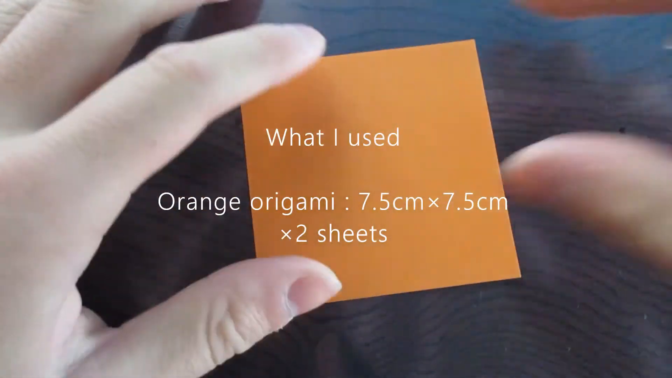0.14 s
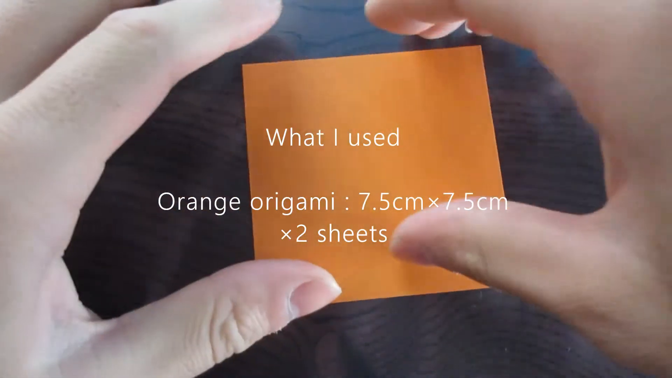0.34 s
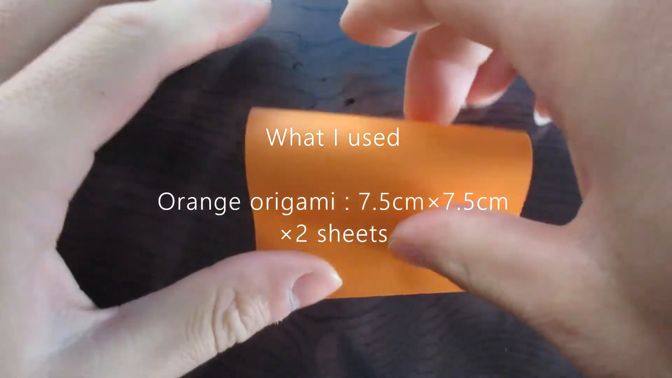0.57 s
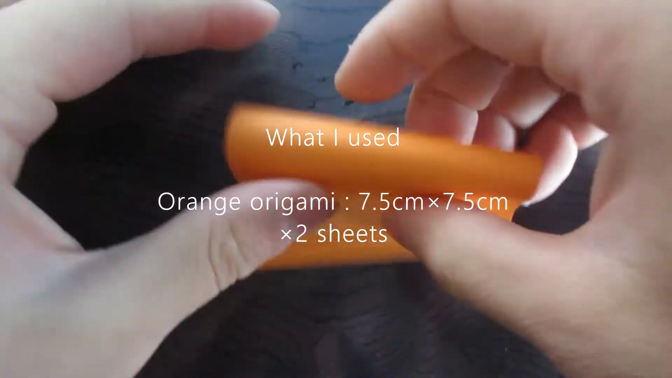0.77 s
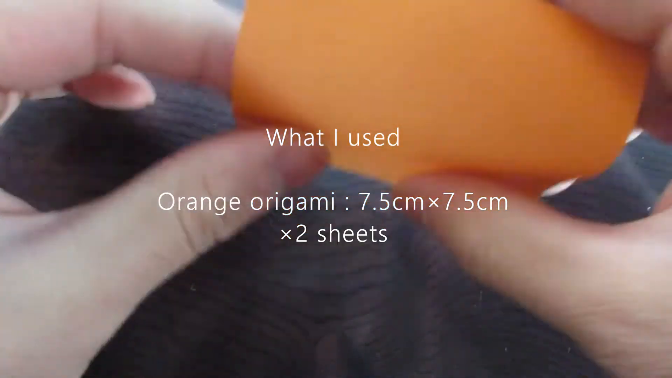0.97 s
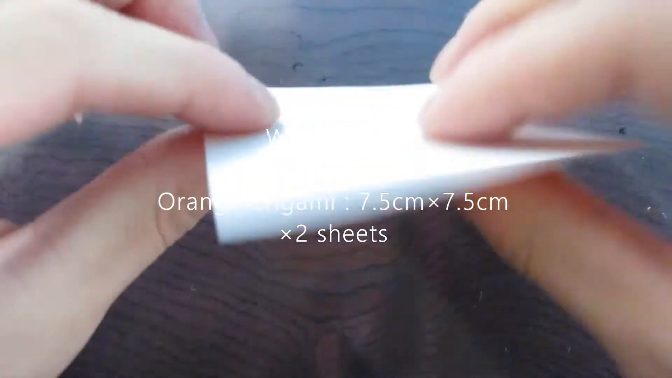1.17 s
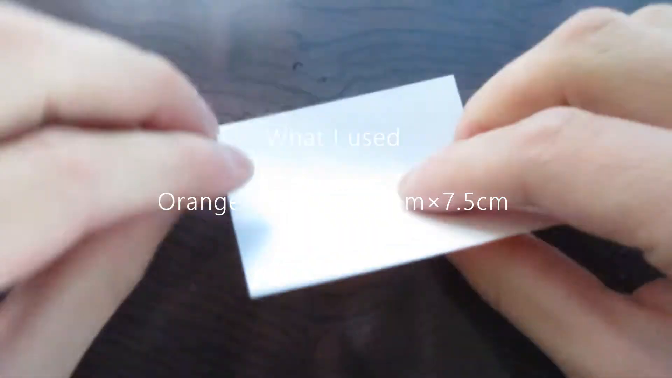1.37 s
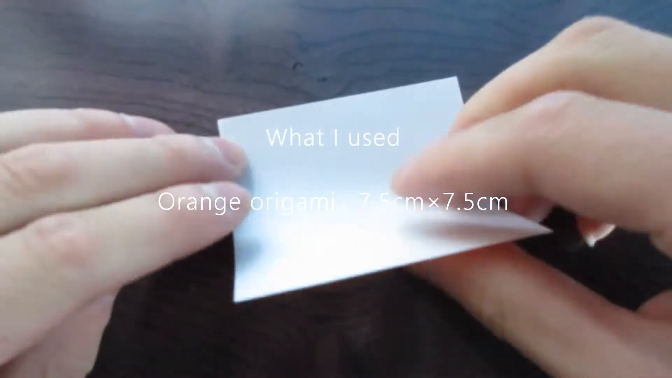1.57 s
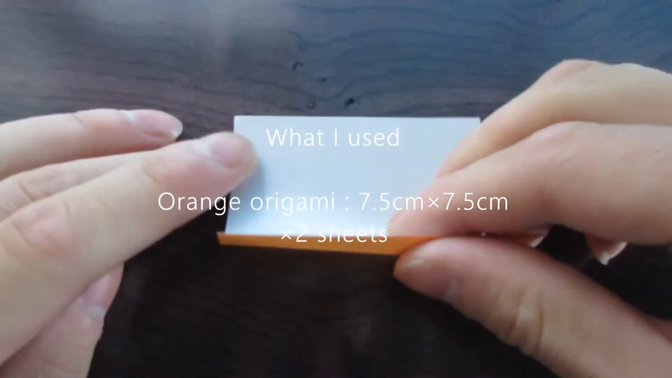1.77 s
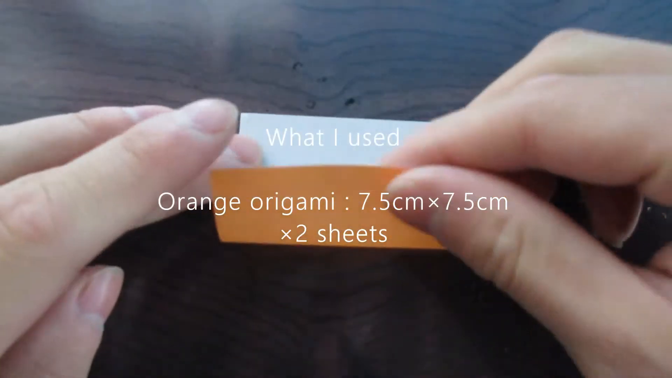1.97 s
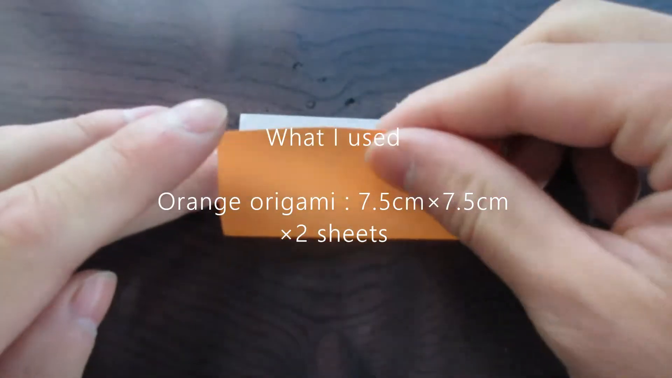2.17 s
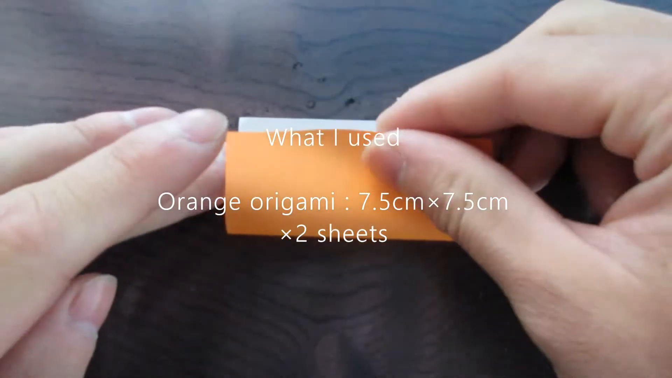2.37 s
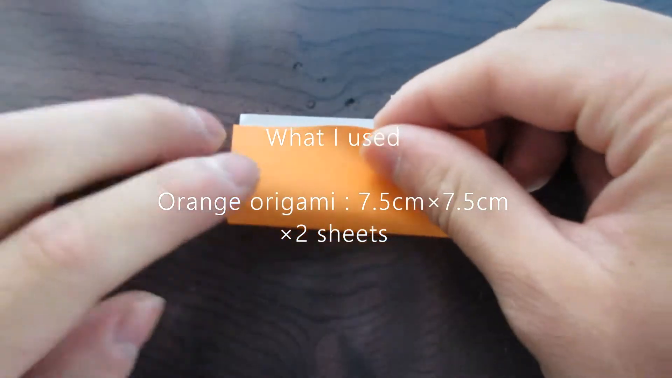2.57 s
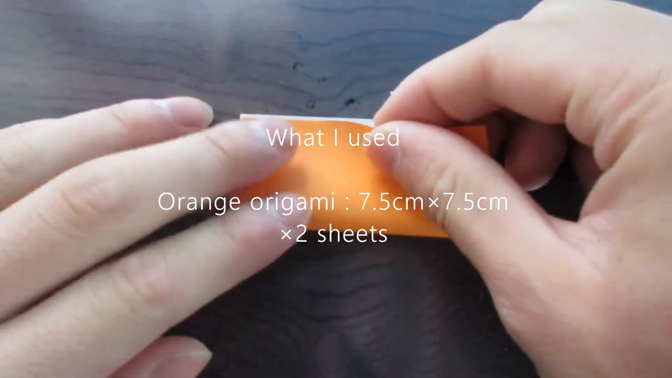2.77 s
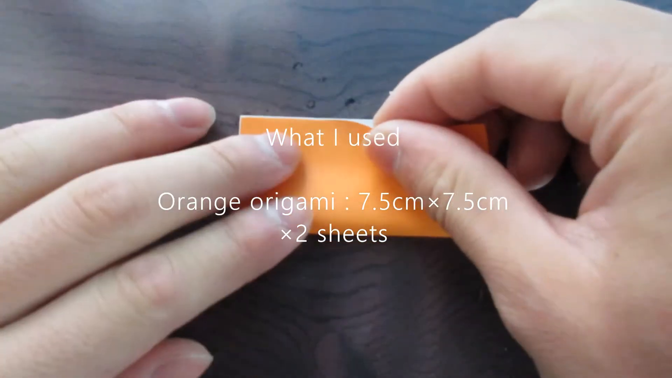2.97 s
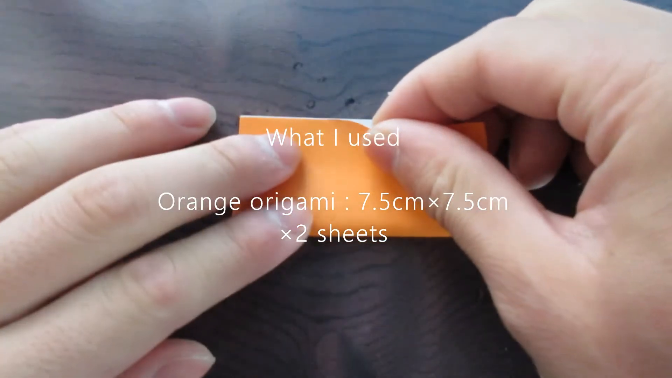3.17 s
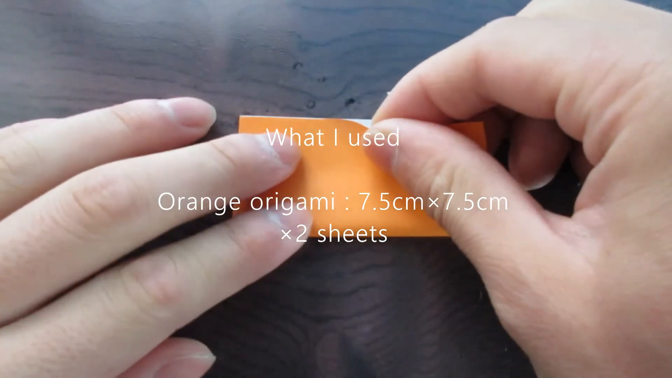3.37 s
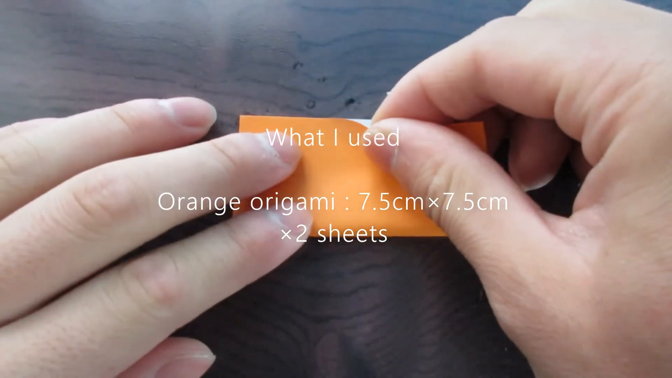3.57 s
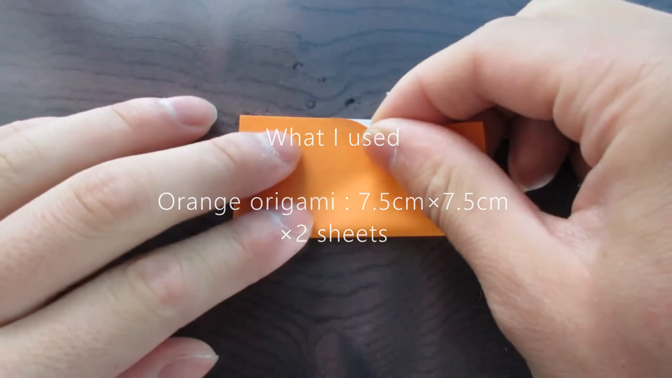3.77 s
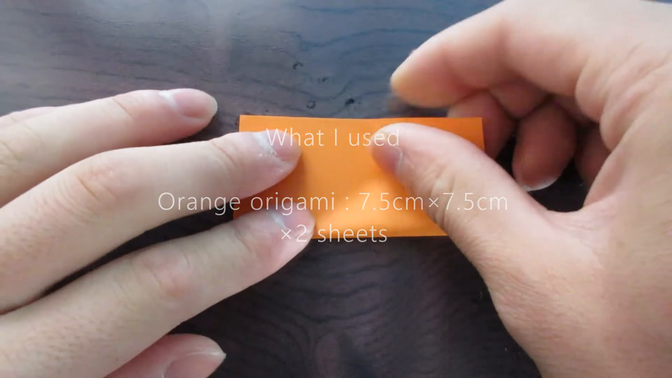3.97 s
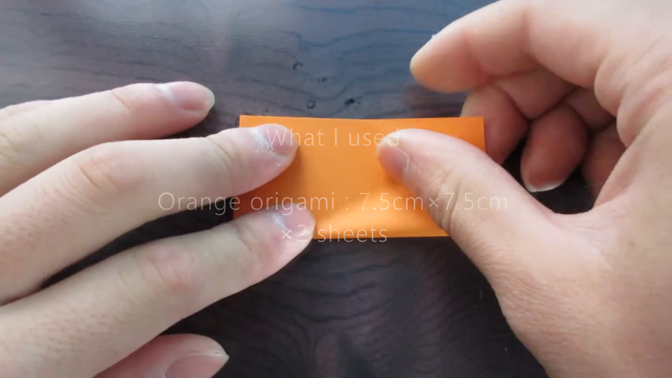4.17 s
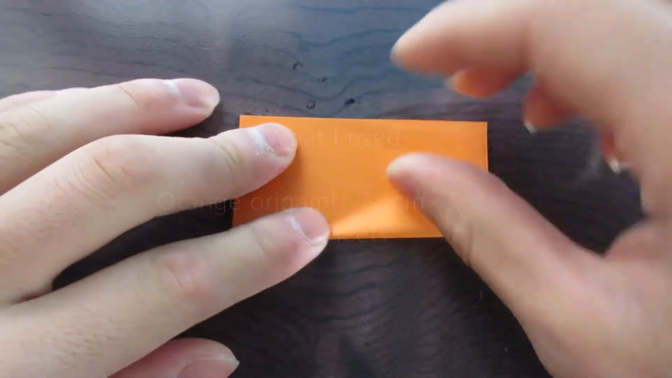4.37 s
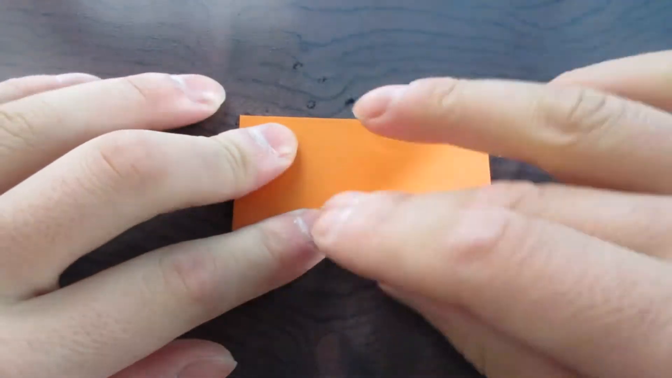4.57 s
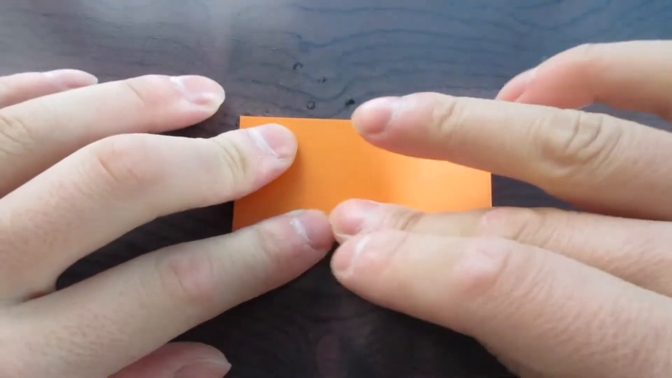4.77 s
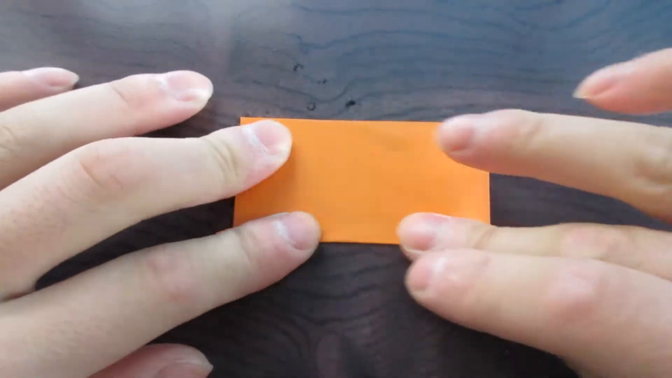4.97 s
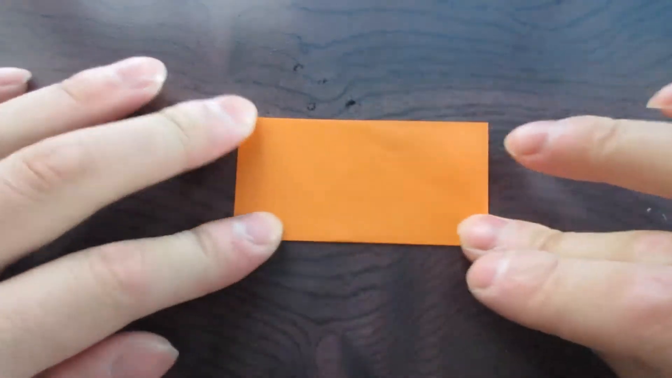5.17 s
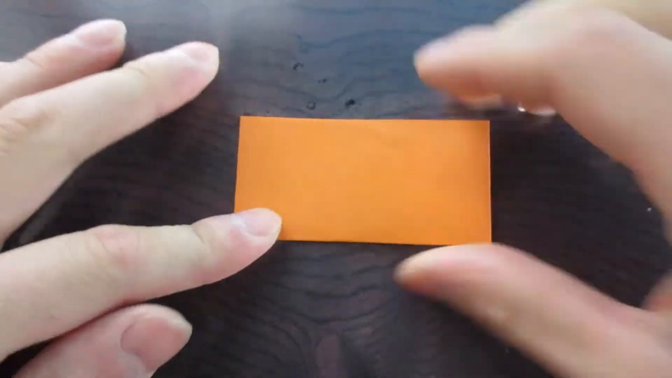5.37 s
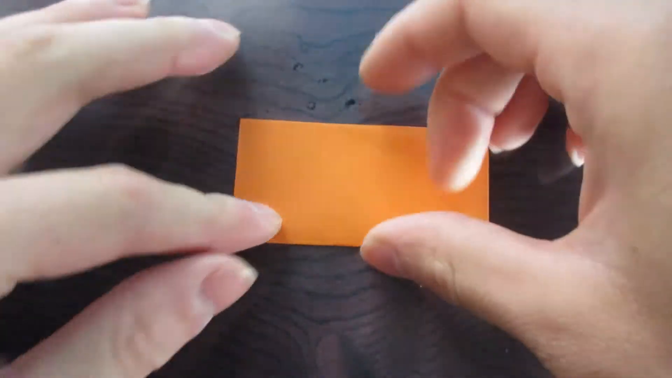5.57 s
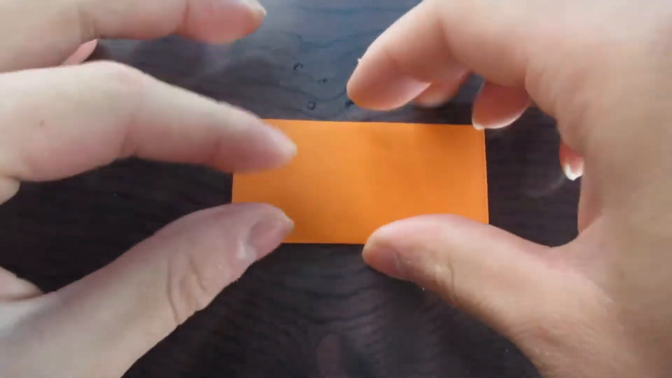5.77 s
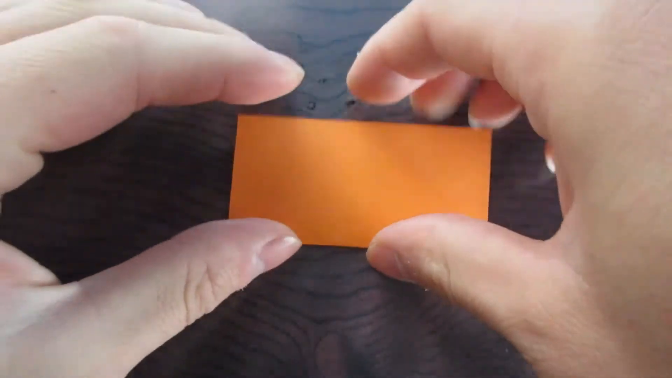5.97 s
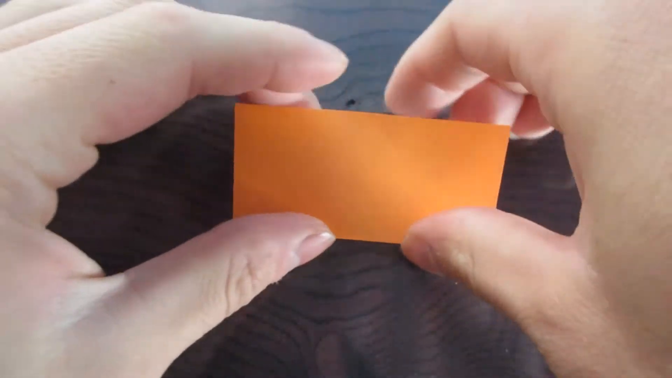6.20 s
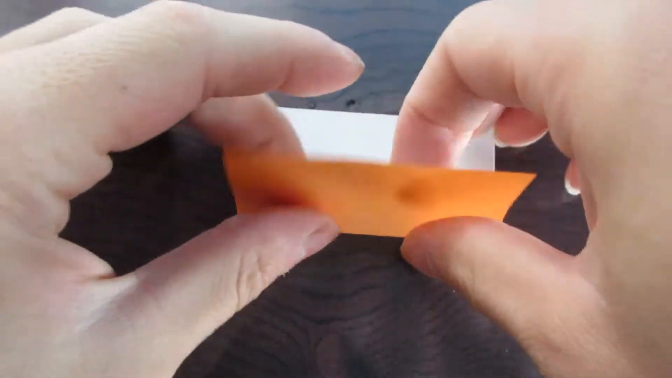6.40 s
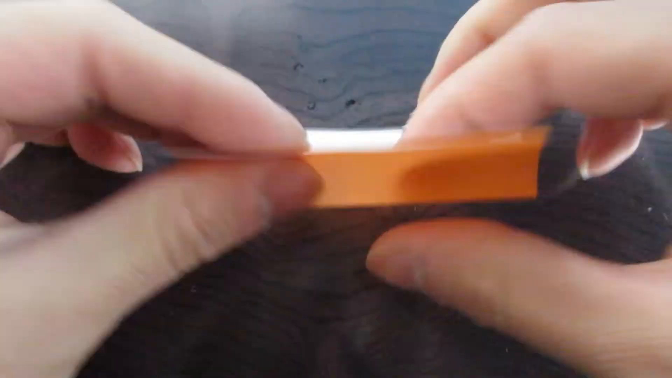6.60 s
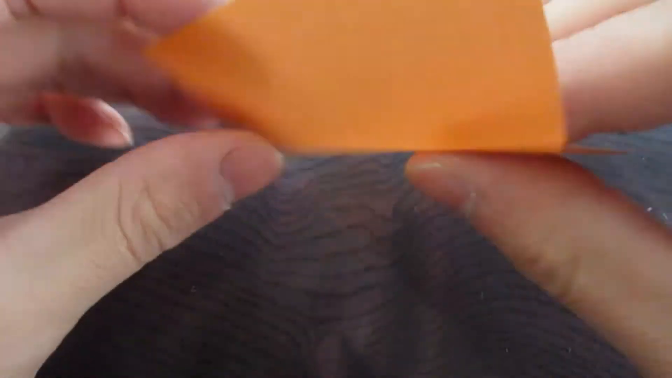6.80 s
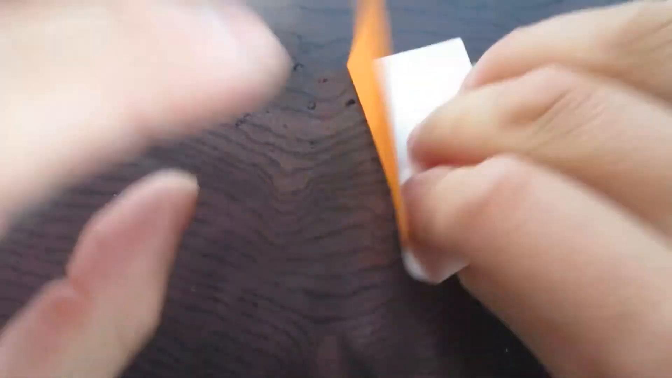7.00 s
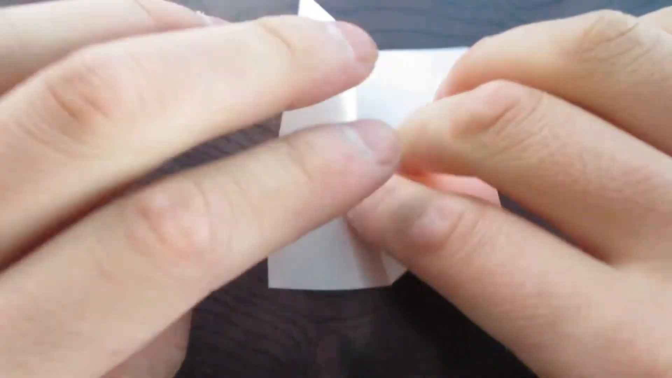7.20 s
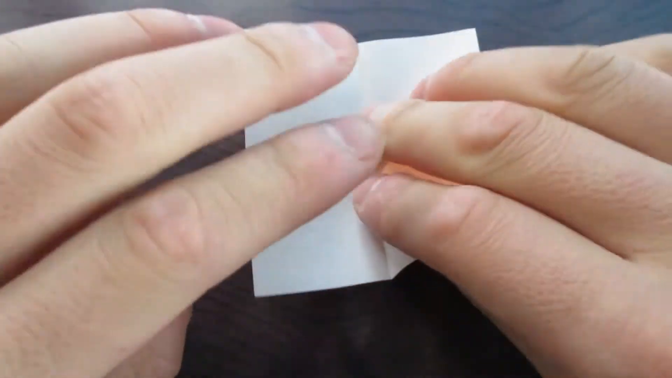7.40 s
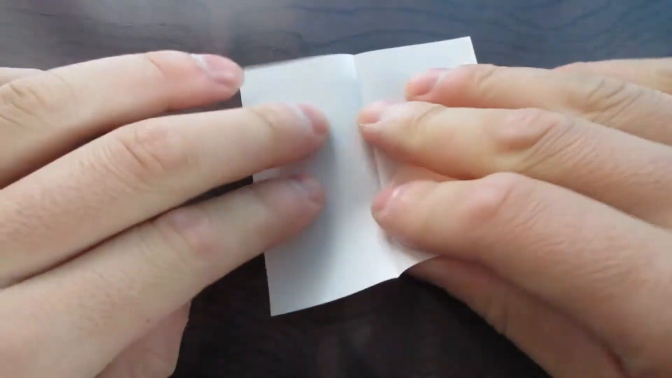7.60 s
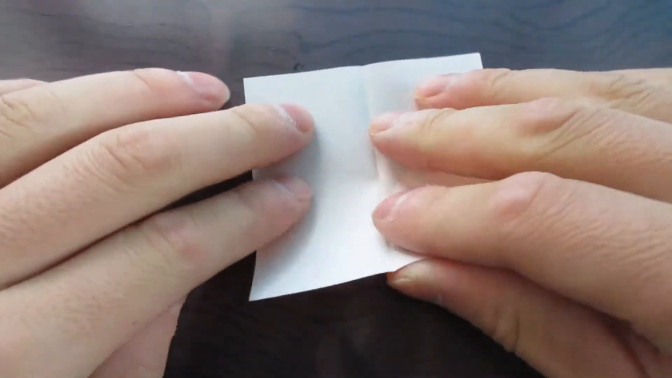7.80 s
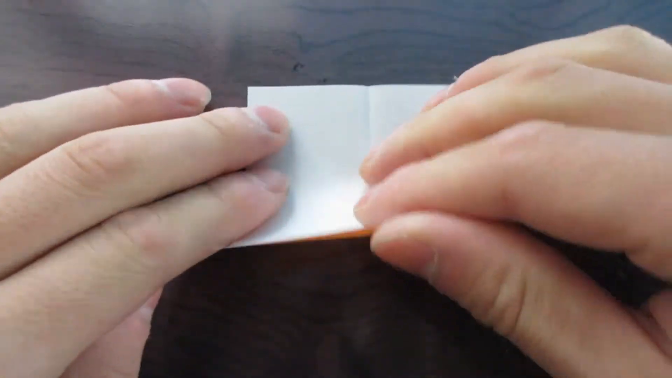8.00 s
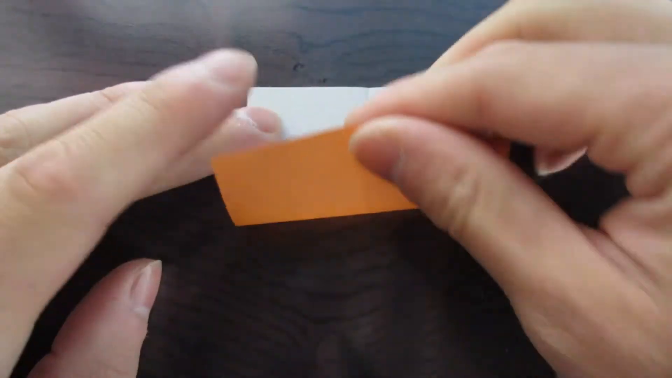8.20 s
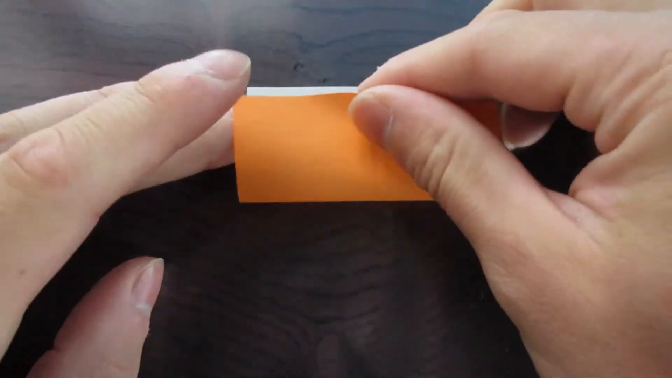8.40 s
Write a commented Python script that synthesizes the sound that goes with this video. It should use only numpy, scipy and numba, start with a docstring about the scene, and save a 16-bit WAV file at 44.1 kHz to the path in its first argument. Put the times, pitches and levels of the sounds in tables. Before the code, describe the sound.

Hands fold a small paper sheet on a wooden table, heard very close in a quiet room. Soft finger taps and short swishes lead to a sharp cluster of snaps as the sheet flips. Softer creasing rubs follow, then a near-still pause with one small tick. Brighter strokes and taps resume, and a second flip crackles before firm smoothing swishes and a last crisp tick and thud.

```python
"""A small square of paper is folded and creased by hand on a wooden table, close by in a quiet room.
Room air runs throughout. Taps, strokes, snaps and scuffs start in that order and then intermingle to the end:
taps are shaped clicks that thud, ring table modes and knock the paper; strokes are dense slips through a
pocket resonance plus fibre hiss; snaps are bursts of tiny buckles; scuffs are coarse jerks with crinkles and
table rumble. From 1.1 s shifting hands rustle faintly over long spans. All but the air gets scatter and a tail."""
import sys
import numpy as np
from scipy import signal
from scipy.fft import rfft, irfft
from scipy.io import wavfile
from scipy.ndimage import uniform_filter1d
from numba import njit

SR = 44100
rng = np.random.default_rng(int(sys.argv[2]) if len(sys.argv) > 2 else 0)


def inscribe(sig):
    """Save sig as 16-bit PCM at rate SR to the path in sys.argv[1].

    A 1-D sig is mono; a 2-D sig holds one channel per row.
    Samples are clipped to [-1, 1] before scaling.
    """
    pcm = np.round(np.clip(np.atleast_2d(sig).T, -1, 1) * 32767)
    wavfile.write(sys.argv[1], SR, pcm.astype(np.int16))


N = 372644

# Colour of the room air. Each row: frequency in Hz, gain in dB.
ROOM_COLOUR = [(15, -70), (25, -18), (69, -7.5), (415, -11), (500, -13.5), (856, -11), (15000, -33.5)]
# Fingers landing on the table. Each row: start in seconds, thump level in dB, knock over thump in dB.
TAPS = [(.287, -30.5, -3.5), (.303, -34.5, -34), (.441, -37.5, -5.5), (.841, -45.5, 17.5),
        (.888, -50.5, 13), (1.39, -47, -8), (1.475, -47.5, 15.5), (3.985, -43, -1.5), (4.525, -61, 13),
        (5.388, -40, -7), (5.4, -35.5, 2.5), (5.409, -33, -10), (5.72, -47.5, 5), (5.78, -40.5, -7.5),
        (5.992, -36.5, 3.5), (6.555, -50.5, 14.5), (6.763, -54, 26.5), (7.099, -44.5, -1.5),
        (7.572, -43, 2.5), (7.657, -53.5, 14.5), (7.672, -50, -1), (8.368, -33, 2.5), (8.386, -40, -10)]
# Table-top modes. Each row: frequency in Hz, level in dB, 60 dB decay time in seconds.
TABLE_MODES = [(101, -3.5, 0.091), (139, -6.5, 0.069), (259, -1.5, 0.11), (290, -3.5, 0.081),
               (329, -6.5, 0.15), (500, -1, 0.041), (689, -2.5, 0.1), (1140, -10, 0.065)]
# Colour of a fingertip's soft thud. Each row: frequency in Hz, gain in dB.
THUD_COLOUR = [(40, -30), (95, 3), (420, -0.5), (750, -4.5), (2000, -34)]
# Colour of the paper knocked under a finger. Each row: frequency in Hz, gain in dB.
KNOCK_COLOUR = [(100, -17), (400, -5.5), (760, 7.5), (1150, 2.5), (1900, -5), (12000, -24.5)]
# Paper sliding on paper, skin and wood. Each row: start in seconds, length in seconds, pocket resonance in Hz,
# its relative width, swish level in dB, hiss over swish in dB.
STROKES = [(0.455, 0.022, 6850, .4, -42.5, 4), (0.454, 0.11, 2900, .3, -39, -3.5),
           (0.516, 0.23, 2770, 0.26, -41.5, -1), (0.75, 0.15, 2900, 0.42, -40.5, 1),
           (0.864, 0.054, 3740, 0.96, -28.5, -19), (1.009, 0.0664, 3080, .3, -39.5, 4),
           (1.112, 0.19, 2200, 0.19, -58, -25), (1.242, 0.25, 2420, 0.23, -50.5, -6),
           (1.359, 0.052, 2900, 0.68, -36.5, -5.5), (1.553, 0.33, 3300, 0.7, -42.5, -2.5),
           (1.759, 0.42, 3800, 0.55, -52.5, -11), (2.338, 0.18, 3100, .3, -48.5, -2),
           (2.51, 0.096, 3020, 0.21, -44.5, -1), (2.681, 0.15, 3060, 0.2, -42, -12),
           (3.952, 0.094, 4800, .35, -42, -9), (4.157, 0.32, 5540, .25, -48.5, 2),
           (4.354, 0.18, 5600, 0.25, -38, -4.5), (4.481, 0.13, 5100, .16, -41.5, -9),
           (4.76, 0.2793, 8900, 0.5, -47.5, 0.5), (4.804, 0.46, 2580, 1.1, -53, -3),
           (5.321, 0.062, 8900, 0.29, -42, -25), (5.662, 0.05, 6950, 0.37, -42.5, -6),
           (5.842, 0.039, 6400, 0.26, -44.5, -20), (6.244, 0.43, 2330, 2.1, -51.5, -1),
           (6.53, 0.22, 2550, 0.92, -48.5, 7), (6.742, 0.087, 3900, .3, -39.5, 10.5),
           (6.816, 0.085, 4060, .4, -50.5, 11), (7.023, 0.15, 3200, 0.63, -44.5, 2.5),
           (7.148, 0.22, 4900, .8, -37.5, -6), (7.279, 0.25, 3700, 0.49, -40.5, -16),
           (7.566, 0.15, 5340, 1.24, -41.5, -13), (7.746, 0.33, 3250, 0.43, -41, -3.5),
           (8.011, 0.15, 2500, .9, -45, 3), (8.229, 0.058, 4920, 0.57, -57, 9),
           (8.329, 0.16, 3600, .7, -40.5, -7.5)]
# Colour of the paper fibres. Each row: frequency in Hz, gain in dB.
FIBRE_COLOUR = [(1500, -18), (3500, -5), (5000, -4), (7800, -1.5), (11000, -7.5), (13000, -9.5),
                (15500, -21.5)]
# Buckles of the sheet. Each row: time in seconds, die-away time in seconds, pocket resonance in Hz,
# level in dB, crack over ring in dB.
SNAPS = [(0.644, 0.0078, 2670, -30, -5.5), (0.659, 0.0031, 2850, -23, -15), (0.69, 0.00064, 2940, -18, -15),
         (.702, 0.0077, 2850, -30.5, -12), (0.8417, 0.0049, 4800, -15, 13),
         (0.896, 0.0033, 3760, -22.5, -2), (0.9, 0.003, 3500, -25.5, -1), (0.921, 0.0017, 3150, -30.5, -11),
         (1.031, 0.0045, 3000, -26.5, -9.5), (1.1103, 0.0025, 4470, -39, -11),
         (1.124, 0.0043, 1870, -35, -16), (1.159, 0.0042, 2150, -33.5, -18), (0.9105, 0.002, 2980, -33, -8),
         (1.152, 0.0042, 1960, -35.5, -10), (1.191, 0.005, 2100, -45, -24), (1.393, 0.0024, 2680, -40, 18),
         (1.399, 0.0015, 2730, -42.5, 4), (2.725, .003, 3180, -40, -12), (2.773, 0.0083, 3030, -39, -4.5),
         (4.305, 0.0055, 5200, -40, 10), (3.2572, 0.0013, 3300, -28, -18), (4.329, 0.0069, 4250, -33, 2),
         (4.339, 0.002, 4750, -30.5, 1), (4.513, 0.014, 4950, -26, 4), (4.727, 0.0028, 3490, -50, -19.5),
         (5.511, 0.0073, 8150, -33, -0.5), (5.8347, 0.002, 6210, -35, 4),
         (6.556, 0.0073, 2800, -33.5, -4.5), (6.612, 0.0036, 2310, -39, 5), (6.636, 0.0044, 2500, -36, -1),
         (6.678, 0.0022, 2810, -44, -1), (6.7626, 0.0044, 3900, -19.5, 1),
         (6.886, 0.00224, 2920, -35, -1.5), (6.98, 0.002, 1600, -41, -13), (7.0, 0.00185, 2290, -33, -11),
         (7.006, 0.0058, 2300, -33, -15), (7.0153, 0.002, 2360, -28, -5.5),
         (7.036, 0.0017, 3070, -23, -9.5), (7.0885, 0.0028, 3440, -34, -2),
         (7.3156, 0.0033, 3500, -21.5, -12.5), (7.353, .001, 3700, -40, -11),
         (7.368, 0.00069, 3300, -33.5, -26), (7.4677, 0.000059, 3020, -18, -19.5),
         (8.1077, 0.0019, 8040, -21, 2)]
# Colour of the whole sheet flapping. Each row: frequency in Hz, gain in dB.
FLAP_COLOUR = [(100, -29), (600, -4), (1100, 8), (1700, 17), (2500, 2.5), (5000, -56.5)]
# Fingertips scuffing and flexing the loose sheet. Each row: start in seconds, length in seconds,
# sheet resonance in Hz, level in dB.
SCUFFS = [(0.83, 0.12, 1260, -37.5), (1.008, 0.061, 970, -42), (1.109, 0.14, 1260, -42),
          (4.762, 0.51, 1080, -52.5), (6.219, 0.068, 710, -46), (6.3, 0.27, 820, -44.5),
          (6.545, 0.18, 990, -45), (6.885, 0.077, 1310, -44), (6.975, 0.06, 1260, -38),
          (7.723, 0.56, 1537, -53), (8.343, 0.047, 990, -47)]
# Hands shifting on the sheet. Each row: start in seconds, end in seconds.
HANDLING_SPANS = [(1.1, 3.02), (3.87, 4.6), (4.8, 6.5), (7.561, 8.4)]

ROOM_DB = -54.5
SETTLE_S, SETTLE_HALVING_DB = 0.013, 10  # settling time halves for each such rise of knock over thump
CREST_SHARE, SWELL_POWER = 0.42, 0.82  # where in a stroke the finger is fastest; shape of the crest
POCKET_FLEX_DB = 0.93  # wander of the pocket's pitch, as 20 log10 of the frequency ratio
SKIRT_SPREAD, SKIRT_DB = 7.3, -4  # open sheet: band broader by this factor; level against the hollow sound
GRIP_DB, SHUDDER_DB = 1.3, 1.7  # slow wander of the whole rub; fast wander of the swish
CATCH_PER_S, CATCH_SPREAD_DB, CATCH_DB = 200, 2.9, 4  # caught fibres: rate, size spread, size against slips
SHEET_RING_S, SHEET_RING_DB = 0.0016, -3  # die-away time; level against the direct sound
SHEET_SHIFT_PER_S = 8.93  # new sets of sheet resonances
BUILD_SHARE = 0.36  # build-up time of a snap as a share of its die-away time
LEAD_HISS_S, LEAD_HISS_DB = 0.042, -20  # rise time of the faint hiss ahead of a snap; level against the crack
FLAP_DB = -11.5  # flap against snap
SCUFF_WIDTH = 0.8  # relative width of each of two band-passes
DRAG_DB, DRAG_LOW_HZ = -10.5, 200  # table rumble against rumple; high-pass corner of its drive
CRINKLE_PER_S, CRINKLE_HZ, CRINKLE_WIDTH, CRINKLE_DB = 140, 2500, 0.9, -1.5  # Hz is the mean pitch
HANDLING_HZ, HANDLING_WIDTH, HANDLING_DB, HANDLING_HISS_DB = 3130, 0.81, -61.5, 1
TOP_HZ = 15100


def undb(db):
    """Decibels to gain."""
    return 10 ** (np.asarray(db) / 20)


def unit(x):
    """Scale to rms 1."""
    return x / np.sqrt(np.mean(x ** 2))


def burst(x, db):
    """Scale a short sound to the energy of 10 ms at the given rms level."""
    return x * undb(db) * np.sqrt(.01 * SR / np.sum(x ** 2))


def add(out, start_s, x):
    """Mix x into out from start_s."""
    i = int(start_s * SR)
    out[i:i + len(x)] += x[:N - i]


def colour(x, points):
    """Minimum-phase filter through (Hz, dB) points, built by folding the cepstrum."""
    hz, db = np.transpose(points)
    size = 4096
    bin_hz = np.arange(size // 2 + 1) * SR / size
    gain_db = np.interp(np.log(bin_hz + 1), np.log(hz), db)
    cepstrum = irfft(np.log(undb(gain_db)))
    cepstrum[1:size // 2] *= 2
    cepstrum[size // 2 + 1:] = 0
    response = irfft(np.exp(rfft(cepstrum)))
    return signal.fftconvolve(x, response)[:len(x)]


@njit
def svf(x, hz, width):
    """State-variable band-pass with a moving centre and a relative width."""
    y, band, low = np.empty(len(x)), 0., 0.
    for i in range(len(x)):
        g = np.tan(np.pi * min(hz[i], .45 * SR) / SR)
        v = (band + g * (x[i] + 1e-18 - low)) / (1 + g * (g + width))
        band, low, y[i] = 2 * v - band, low + 2 * g * v, width * v
    return y


def steep_band(x, hz, width):
    """Two equal band-passes in series give a steeper resonance."""
    return svf(svf(x, hz, width), hz, width)


def slips(count, per_s, spread_db):
    """Fibres catch and let go: random clicks of uneven size and either sign."""
    hit = rng.random(count) < per_s / SR
    size = undb(spread_db * np.minimum(rng.exponential(size=count), 4))
    return hit * size * rng.choice([-1, 1], count)


def walk(count, rate_hz):
    """Slow chance: random levels held at rate_hz, smoothed twice, spread near 1."""
    hold = int(SR / rate_hz)
    steps = np.repeat(rng.standard_normal(count // hold + 1), hold)
    return 1.3 * uniform_filter1d(uniform_filter1d(steps, hold), hold)[:count]


def room_air():
    """Steady air of the room: coloured noise."""
    return unit(colour(rng.standard_normal(N), ROOM_COLOUR)) * undb(ROOM_DB)


def table_ring(count):
    """Table modes answer a soft push as decaying cosines, mixed at random for each spot."""
    t = np.arange(count) / SR
    modes = np.array([undb(db) * np.cos(2 * np.pi * hz * t) * np.exp(-np.log(1000) * t / t60_s)
                      for hz, db, t60_s in TABLE_MODES])
    spot = rng.choice([-1, 1], len(modes)) * undb(rng.standard_normal(len(modes)))
    flesh = signal.butter(2, 1300, fs=SR, output="sos")  # flesh softens the blow
    return signal.sosfilt(flesh, spot @ modes)


def taps():
    """A soft fingertip thuds and rings the table; the paper under it knocks."""
    out, t = np.zeros(N), np.arange(SR // 3) / SR
    for start_s, thump_db, knock_db in TAPS:
        settle_s = SETTLE_S * .5 ** (knock_db / SETTLE_HALVING_DB)
        push = slips(len(t), per_s=1900, spread_db=3.0) * np.exp(-t / settle_s)
        push[0] += 4  # first contact
        ring = burst(table_ring(len(t)), thump_db - 1.6)
        thud = burst(colour(push, THUD_COLOUR), thump_db - 3.5)
        knock = burst(colour(push, KNOCK_COLOUR), thump_db + knock_db)
        add(out, start_s, ring + thud + knock)
    return out


def swell(length_s):
    """Speed of a finger through one stroke: it gathers, crests and stops."""
    along = np.linspace(0, 1, int(length_s * SR))
    phase = np.interp(along, [0, CREST_SHARE, 1], [0, np.pi / 2, np.pi])
    return np.sin(phase) ** SWELL_POWER


def pocket(x, hz, width, upper_ratio, upper_db):
    """Air under the curved sheet: one steep resonance minus a weaker, higher one."""
    hz = hz * np.ones(len(x))
    low = steep_band(x, hz, width)
    high = steep_band(x, hz * upper_ratio, width)
    return low - undb(upper_db) * high


def sheet(x):
    """The sheet's many small resonances: short noise responses, cross-faded at a steady rate."""
    t = np.arange(256) / SR
    hold = np.arange(len(x)) / SR * SHEET_SHIFT_PER_S
    out = x.copy()
    for k in range(int(hold[-1]) + 2):
        ring = rng.standard_normal(len(t)) * np.exp(-t / SHEET_RING_S) * (t > 0)
        ring /= np.linalg.norm(ring)
        fade = np.cos(np.pi / 2 * np.clip(hold - k, -1, 1))
        out += undb(SHEET_RING_DB) * fade * signal.fftconvolve(x, ring)[:len(x)]
    return out


def rubbing(count, hz, width, hiss_db):
    """Dense slips under fairly even pressure: hollow pocket swish, fine fibre hiss, small ticks."""
    hz = hz * undb(POCKET_FLEX_DB * walk(count, 14.2))
    catches = slips(count, CATCH_PER_S, CATCH_SPREAD_DB) * undb(CATCH_DB)
    hollow_push = slips(count, per_s=3500, spread_db=3.5) + catches
    hollow = pocket(hollow_push, hz, width, upper_ratio=1.66, upper_db=-13)
    skirt_push = slips(count, per_s=4000, spread_db=2.5) + catches
    skirt = sheet(steep_band(skirt_push, hz, min(SKIRT_SPREAD * width, 2)))
    swish = unit(unit(hollow) + undb(SKIRT_DB) * unit(skirt))
    hiss = sheet(colour(slips(count, per_s=8000, spread_db=4.0) + catches, FIBRE_COLOUR))
    rub = swish * undb(SHUDDER_DB * walk(count, 220)) + unit(hiss) * undb(hiss_db)
    return rub * undb(GRIP_DB * walk(count, 37.75))


def sliding():
    """Strokes rub the paper, loudest at top finger speed; a closed pocket rings narrowly, a leaky one broadly."""
    out = np.zeros(N)
    for start_s, length_s, hz, width, db, hiss_db in STROKES:
        speed = swell(length_s)
        add(out, start_s, rubbing(len(speed), hz, width, hiss_db) * speed * undb(db))
    return out


def snaps():
    """A faint rising hiss leads into a run of tiny buckles that ring the pocket, flap the sheet and crack."""
    out, count = np.zeros(N), 4096
    lead = count // 3  # samples ahead of the snap
    t = (np.arange(count) - lead) / SR
    for start_s, fall_s, hz, db, crack_db in SNAPS:
        shape = np.exp(-abs(t) / np.where(t < 0, BUILD_SHARE * fall_s, fall_s))
        push = slips(count, per_s=6000, spread_db=1.5) * shape
        push[lead] += 3  # the crease itself gives way
        lead_push = slips(count, per_s=6000, spread_db=5.0) * np.exp(-abs(t) / LEAD_HISS_S) * (t < 0)
        ring = pocket(push, hz, width=0.3, upper_ratio=1.556, upper_db=-9.5)
        crack = burst(colour(push, FIBRE_COLOUR), crack_db)
        lead_hiss = burst(colour(lead_push, FIBRE_COLOUR), crack_db + LEAD_HISS_DB)
        snap = burst(burst(ring, 0) + crack + lead_hiss, db)
        flap = burst(sheet(colour(push, FLAP_COLOUR)), db + FLAP_DB)
        add(out, start_s - lead / SR, snap + flap)
    return out


def scuffing():
    """Coarse, jerky skin slips flex the sheet: low rumple, dry crinkles and a rumble of the table below."""
    out = np.zeros(N)
    shove_filter = signal.butter(2, DRAG_LOW_HZ, "high", fs=SR, output="sos")
    for start_s, length_s, hz, db in SCUFFS:
        speed = swell(length_s)
        count = len(speed)
        centre_hz = hz * undb(0.5 * walk(count, 19.0))
        jerks = slips(count, per_s=1100, spread_db=3.0) * undb(2 * walk(count, 104.5))
        rumple = sheet(steep_band(jerks, centre_hz, SCUFF_WIDTH))
        shove = signal.sosfilt(shove_filter, jerks)
        drag = signal.fftconvolve(shove, table_ring(count))[:count]
        buckles = slips(count, CRINKLE_PER_S, spread_db=4.5)
        pitch_hz = CRINKLE_HZ * undb(2 * walk(count, 153))
        crinkle = steep_band(buckles, pitch_hz, CRINKLE_WIDTH)
        crinkle *= np.sqrt(SR / CRINKLE_PER_S)  # offsets the sparse rate
        scuff = unit(rumple) + unit(drag) * undb(DRAG_DB) + crinkle * undb(CRINKLE_DB)
        add(out, start_s, scuff * speed * undb(db))
    return out


def handling():
    """A faint, fitful rustle of rubbing while the hands shift their hold."""
    out = np.zeros(N)
    for start_s, end_s in HANDLING_SPANS:
        count = int((end_s - start_s) * SR)
        touch = signal.windows.tukey(count, .1) * undb(HANDLING_DB + 0.8 * walk(count, 10.8))
        add(out, start_s, rubbing(count, HANDLING_HZ, HANDLING_WIDTH, HANDLING_HISS_DB) * touch)
    return out


def echoes(x, t60_s, wet_db, near_s, near_db):
    """Quick scatter from hands and table, then the faint tail of the room: decaying noise responses."""
    t = np.arange(SR // 2) / SR
    near = rng.standard_normal(len(t)) * np.exp(-t / near_s) * (t > .0006)
    far = colour(rng.standard_normal(len(t)), [(500, 8), (3000, -13.0), (12000, -16.0)])
    far = far * np.exp(-np.log(1000) * t / t60_s) * (t > .004)
    response = undb(near_db) * near / np.linalg.norm(near) + undb(wet_db) * far / np.linalg.norm(far)
    return signal.fftconvolve(x, response)[:N]


def scene():
    """Paper and table with their echoes over the room air."""
    air = room_air()
    hands = taps() + sliding() + snaps() + scuffing() + handling()
    room = echoes(hands, t60_s=0.54, wet_db=-18.5, near_s=0.0045, near_db=-11.5)
    return (hands + room + air)[None]


def record(dry):
    """Clip at full scale, then cut steeply above TOP_HZ."""
    low_pass = signal.ellip(10, .2, 70, TOP_HZ, fs=SR, output="sos")
    return signal.sosfilt(low_pass, np.clip(dry, -1, 1))


dry = scene()
out = record(dry)
inscribe(out)
```